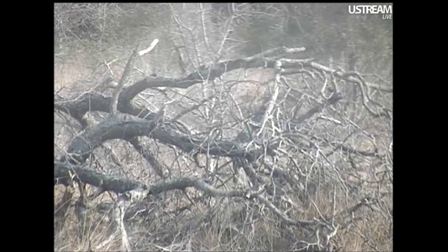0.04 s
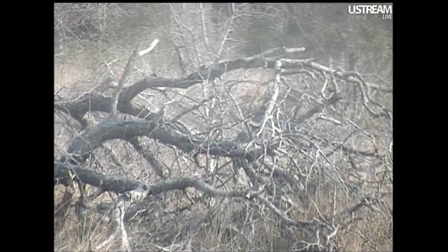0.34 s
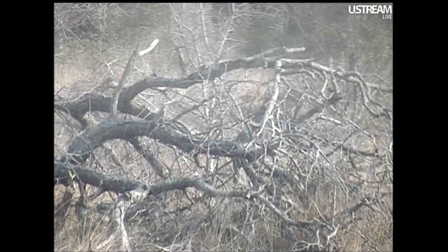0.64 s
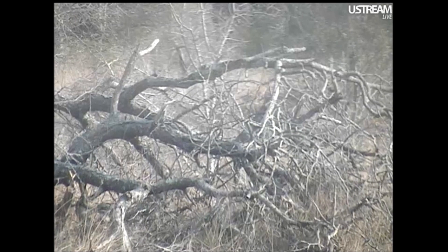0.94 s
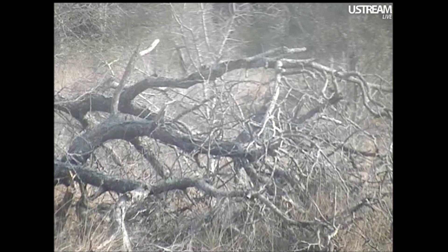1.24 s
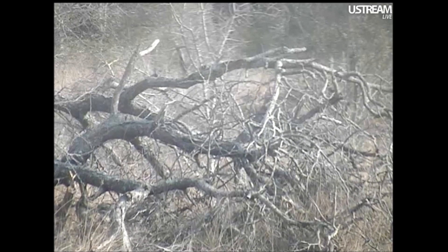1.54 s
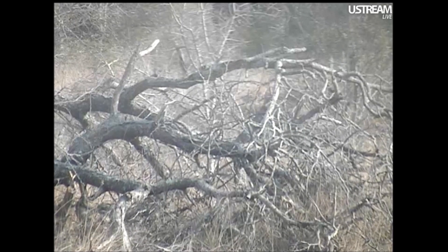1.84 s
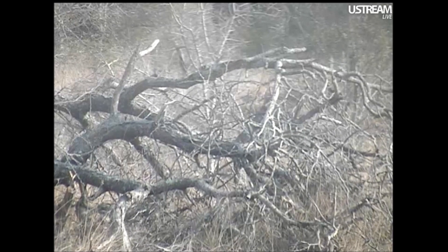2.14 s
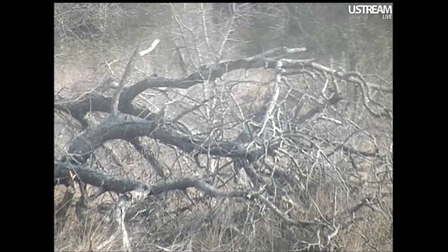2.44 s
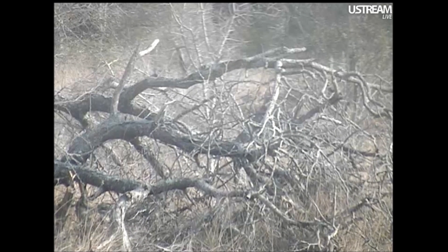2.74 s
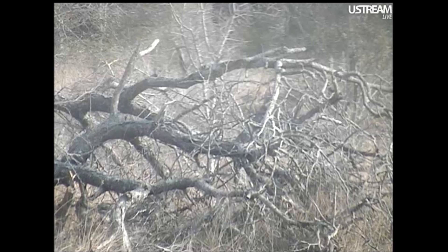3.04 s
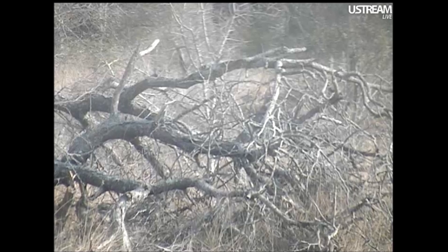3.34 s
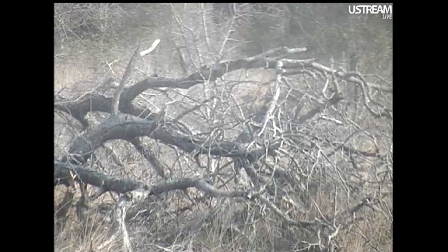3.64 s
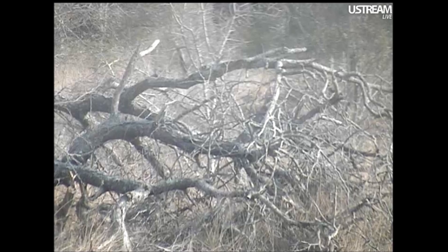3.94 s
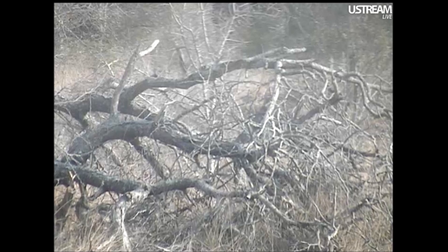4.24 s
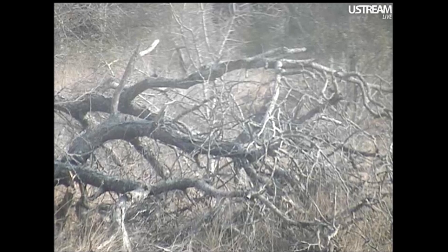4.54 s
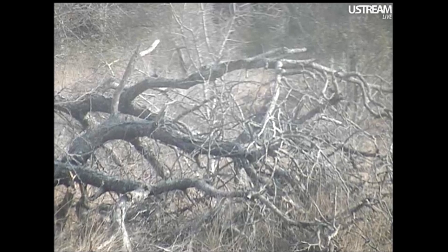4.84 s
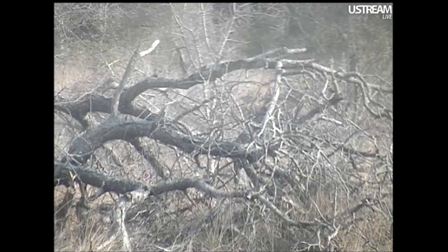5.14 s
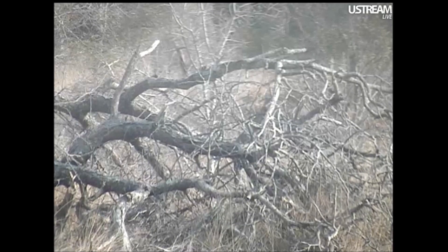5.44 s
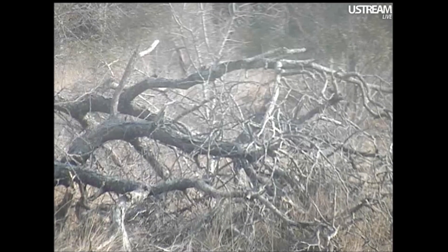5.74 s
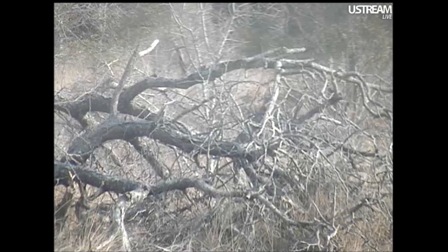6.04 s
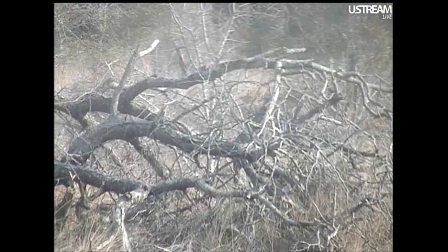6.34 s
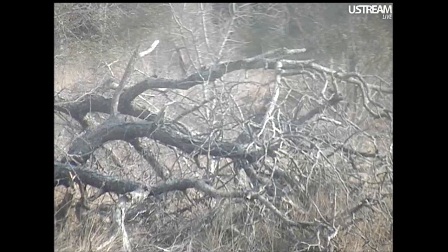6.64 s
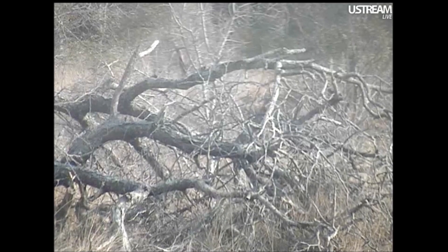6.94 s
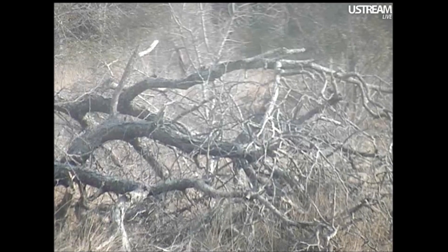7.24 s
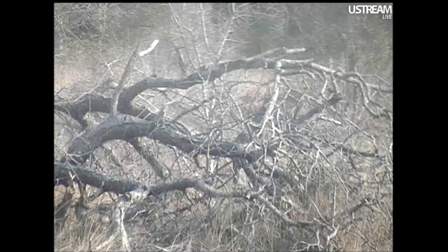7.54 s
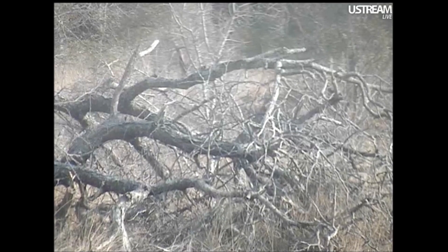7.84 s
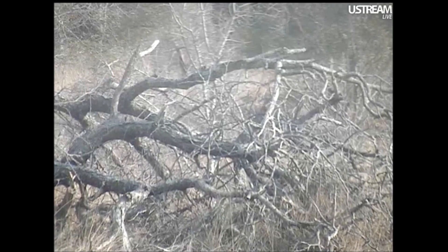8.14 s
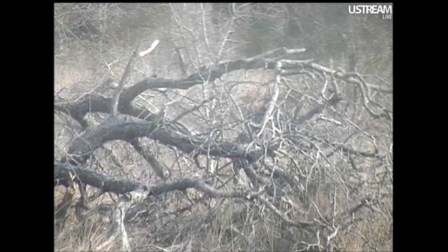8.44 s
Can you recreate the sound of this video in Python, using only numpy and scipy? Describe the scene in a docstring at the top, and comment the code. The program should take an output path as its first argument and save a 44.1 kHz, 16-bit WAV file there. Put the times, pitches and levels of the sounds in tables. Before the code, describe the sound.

In dry bush, a bird opens with one long nasal cry that falls and turns hoarse. Soft ticks and sharp, warbled alarm chips sound with it, and a small bird adds thin rising notes and long high whistles. The ticks stop before halfway, while the close chips grow louder and repeat to the end. One outdoor microphone picks it all up over faint still air and a low electrical hum.

```python
"""Birds raise the alarm in dry bush, heard through one outdoor microphone over still air and mains hum.
A go-away bird opens with a long nasal cry that arches, falls and turns hoarse as its voice slackens.
Soft ticks sound under the cry, and sharp warbled chips each open with the same tick and break downward.
A small bird then adds thin up-slurs and long whistles; faint swoops and dull bumps dot the distance.
The lone ticks stop before halfway, and the chips grow louder and keep on to the end."""
import sys
import numpy as np
from scipy import signal
from scipy.fft import rfft, irfft, next_fast_len
from scipy.io import wavfile
from scipy.ndimage import map_coordinates

SR = 44100
rng = np.random.default_rng(int(sys.argv[2]) if len(sys.argv) > 2 else 0)


def generate_wav(signal):
    """Clip the signal to [-1, 1] and save it as 16-bit WAV at the path in sys.argv[1]."""
    frames = np.transpose(np.atleast_2d(signal))
    scaled = np.clip(frames, -1, 1) * 32767
    pcm = np.round(scaled).astype(np.int16)
    wavfile.write(sys.argv[1], SR, pcm)


N = 378378

# Noise colour of the still air: f/Hz, level/dB
AIR_COLOUR = [(20, -12), (36, -4), (50, 5), (85, -6), (200, -14.5), (380, -22.5), (620, -12), (820, -13),
              (1100, -19.5), (2000, -8), (2900, -10), (4300, -10), (6000, -12), (6700, -14.5), (7300, -13),
              (8300, -25), (9300, -31.5), (15700, -32.5)]
# Harmonics of the mains hum: f/Hz, level/dB
HUM_PARTIALS = [(50, -57), (100, -68.5), (150, -53.5), (200, -72.5), (250, -66.5), (300, -69.5), (350, -82),
                (400, -71), (500, -63), (600, -67.5), (650, -67), (700, -62), (800, -68.5)]
# Reverb tail from the trees: f/Hz, t60/s, level/dB
TREE_REVERB = [(300, 0.42, 8), (1260, 0.51, 0.5), (2120, 1.59, 5.5), (2900, 1.2, -4), (3450, 1.63, 0.5),
               (3800, 1.4, -11.5), (4900, 1, 8.5), (6200, 0.86, 1), (7400, 0.74, 2.5)]
# Dull far bumps: t/s, length/s, centre f/Hz, level/dB
BUMP_CUES = [(2.439, 0.065, 513, -46), (4.882, 0.26, 286, -61.5), (5.393, 0.039, 790, -50),
             (7.232, 0.062, 270, -59)]
# Faint swooping whistles: t/s, length/s, start f/Hz, middle f/Hz, end f/Hz, level/dB
SWOOP_CUES = [(0.603, .16, 2130, 2150, 2386, -43), (2.805, .055, 3150, 2650, 2350, -56),
              (3.039, .31, 3000, 2180, 3070, -57.5), (4.653, 0.053, 2650, 2400, 2210, -50)]
# Soft ticking notes: t/s, relative level/dB
TICK_CUES = [(0.256, -36), (0.422, -31.5), (0.599, -37), (0.776, -32.5), (1.528, -35), (2.158, -37.5),
             (2.311, -31.5), (2.476, -30), (2.807, -39.5), (3.065, -41), (3.383, -42.5), (3.658, -41),
             (3.796, -38)]
# EQ that a tick sweeps through: f/Hz, level/dB
TICK_EQ = [(600, -6), (850, 5.5), (1100, -13), (1500, -3.5), (2200, -8.5), (3100, -0.5), (4000, -9.5),
           (6500, -12), (8000, -23.5)]
# Long whistles: t/s, length/s, start f/Hz, end f/Hz, start level/dB, end level/dB, quaver amount
WHISTLE_CUES = [(1.85, 0.65, 5160, 5900, -51.5, -52, 0.054), (1.871, 0.71, 4135, 4090, -54, -43.5, 0.034),
                (3.804, 0.7, 4670, 4470, -38.5, -31, 0.011), (5.47, .78, 5600, 5220, -53.5, -52.5, .028),
                (5.544, .795, 4806, 4510, -42, -44.5, .021), (8.03, 0.53, 4930, 4650, -44, -56.5, .018)]
# Up-slurs: t/s, length/s, top f/Hz, level/dB
SLUR_CUES = [(1.207, .024, 6900, -45.5), (1.304, .042, 7750, -31.5), (1.405, .037, 7530, -34),
             (1.518, .04, 7410, -33.5), (1.632, .038, 7050, -36), (1.736, .053, 6210, -31),
             (1.778, .055, 5510, -37), (3.276, .043, 7340, -46.5), (3.378, .042, 7400, -43),
             (3.481, .044, 7000, -42), (3.58, .045, 6760, -39), (3.681, .052, 5350, -38),
             (3.833, .034, 8240, -32.5), (3.926, .04, 7500, -38), (4.208, .054, 7760, -45.5),
             (5.163, .05, 8800, -42.5), (5.254, .025, 7700, -42), (5.337, .056, 7050, -42),
             (5.436, .042, 5500, -33.5), (7.306, .03, 8100, -48.5), (7.397, .037, 8200, -34.5),
             (7.63, 0.031, 9200, -35), (7.719, .035, 8400, -44.5), (7.807, .06, 6730, -46.5)]
# Nasal colour of the cry: f/Hz, level/dB
CRY_EQ = [(300, -48), (650, -4.5), (950, -8.5), (1400, -0.5), (2000, -11.5), (2800, -5), (4200, -5.5),
          (5200, -14.5), (6000, -6.5), (6900, -24.5), (8000, -31.5)]
# Volume curve of the cry: t/s, level/dB
CRY_LEVEL = [(.085, -21.5), (.13, -23.5), (.155, -29.5), (.187, -23), (.215, -27.5), (.3, -27), (.4, -33.5),
             (.54, -34.5), (.72, -41), (1.15, -46.5)]
# Path of the cry's moving throat resonance: t/s, f/Hz
CRY_FORMANT = [(.08, 1440), (.11, 1760), (.128, 1620), (.145, 2580), (.22, 2680), (.275, 3070), (.32, 4000),
               (.45, 3370)]
# Alarm chips, before the throat EQ: t/s, warble length/s, tail length/s, f/Hz, level/dB,
# 1st harmonic against the 2nd level/dB, relative tail level/dB
CHIP_CUES = [(0.455, 0.037, .01, 1717, -23, -13, -9.5), (.75, .025, 0.0064, 2180, -25.5, -9.5, -12),
             (1.001, 0.035, 0.023, 1720, -23, -12, -5.5), (1.38, .03, .009, 2190, -24.5, -7.5, -7.5),
             (1.56, .041, .025, 1712, -23, -11.5, -5.5), (3.549, .026, .009, 1668, -24.5, -8, -7),
             (3.73, 0.041, 0.0026, 1754, -17, -10, -25), (3.896, 0.035, 0.0052, 1736, -17, -11, -20),
             (4.124, 0.047, .012, 1815, -21, -6.5, -11), (4.433, .049, 0.0073, 1813, -15.5, -12, -9.5),
             (4.805, 0.051, .016, 1850, -14, -17, -10.5), (5.251, .052, .02, 1866, -18, -9, -10),
             (5.737, .05, .016, 1892, -14.5, -15.5, -7.5), (6.129, .047, .016, 1867, -12.5, -18, -11),
             (6.604, .051, .009, 1868, -16, -14, -4.5), (6.99, .042, .025, 1884, -20.5, -9.5, -0.5),
             (7.471, .047, .017, 1862, -14.5, -11.5, -6), (7.93, .05, .025, 1873, -14, -10.5, -6),
             (8.357, 0.05, .019, 1885, -13.5, -10, -10.5)]
# Throat EQ of the chipping bird: f/Hz, level/dB
CHIP_EQ = [(400, -14.5), (850, 0), (1100, -3.5), (1500, -3.5), (2050, .5), (2600, .5), (3900, -3),
           (4700, -6.5), (5850, 4), (6700, -8.5), (7600, -0.5)]
# Harmonics of a chip's tail: multiple of the pitch, level/dB
TAIL_PARTIALS = [(1, -15), (2, -1), (3, 1.5), (4, -12.5), (5, -14.5), (6, -20)]

FOLD_HZ, TOP_HZ = 8000, 15780  # band edge of the link, final high cut
WARBLE_HZ, BREAK_RATIO = 100.8, .7  # a chip's mean flutter rate, its lower register against its pitch


def amp(db):
    """Decibels to gain."""
    return 10 ** (np.asarray(db) / 20)


def unit(x):
    """x at rms 1."""
    return x / np.sqrt(np.mean(x ** 2) + 1e-20)


def along(points, hz):
    """An EQ curve (f/Hz, level/dB) read on a log frequency axis."""
    f, db = np.transpose(points)
    return np.interp(np.log(hz + 1), np.log(f + 1), db)


def curves(rows, at):
    """Each later column, interpolated along the first."""
    axis, *columns = np.transpose(rows)
    return [np.interp(at, axis, column) for column in columns]


def clock(length):
    """Sample times over a length in seconds."""
    return np.arange(int(max(length, .002) * SR)) / SR


def wobble(rate, t):
    """A smooth random modulator, rate knots a second."""
    u = (t - t[0]) * rate
    return map_coordinates(rng.standard_normal(int(u[-1]) + 4), [u + 1], mode="nearest")


def cycle(hz):
    """Phase of an oscillator that follows a pitch curve."""
    return 2 * np.pi * np.cumsum(hz) / SR


def gate(t, length, rise, fall):
    """A note's envelope with soft fades."""
    return np.sin(np.pi / 2 * np.clip(np.minimum(t / rise, (length - t) / fall), 0, 1)) ** 2


def filtered(x, response):
    """x through a zero-phase EQ, given as gain against frequency."""
    m = next_fast_len(x.shape[-1] + 8192)
    return irfft(rfft(x, m) * response(np.fft.rfftfreq(m, 1 / SR)), m)[..., :x.shape[-1]]


def add(track, s, sound):
    """Mix a sound into a track at s seconds."""
    part = track[max(round(s * SR), 0):][:len(sound)]
    part += sound[:len(part)]


def background():
    """The bed: still air over the bush, and mains hum on the microphone line."""
    t = np.arange(N) / SR
    air = unit(filtered(rng.standard_normal(N), lambda hz: amp(along(AIR_COLOUR, hz))))
    hum = sum(amp(db + .4 * wobble(3, t)) * np.sin(2 * np.pi * (hz * t + rng.random()))
              for hz, db in HUM_PARTIALS)
    return amp(-48) * air + np.sqrt(2) * hum


def bush(x, near_db, far_db):
    """Near branches scatter a short answer; the trees around return a long faint tail."""
    hz, frame_s, noise = signal.stft(rng.standard_normal(SR), SR, nperseg=256)
    t60, colour_db = curves(TREE_REVERB, hz[:, None])
    far = signal.istft(noise * amp(colour_db - 60 * frame_s / t60), SR, nperseg=256)[1][:SR]
    t = np.arange(len(far)) / SR
    far *= 1 - np.exp(-t / .0049)
    near = rng.standard_normal(len(t)) * amp(-60 * t / .12) * (t > .003)
    answer = amp(near_db) * near / np.linalg.norm(near) + amp(far_db) * far / np.linalg.norm(far)
    return x + signal.fftconvolve(x, answer)[:N]


def bumps():
    """Dull, far bumps: short swells of low, narrow-band noise."""
    out = np.zeros(N)
    for s, length, centre_hz, db in BUMP_CUES:
        t = clock(length)
        noise = rng.standard_normal(len(t))
        dull = filtered(noise, lambda hz: 1 / (1 + ((hz - centre_hz) / (.19 * centre_hz)) ** 4))
        add(out, s, amp(db) * unit(dull) * gate(t, length, .6 * length, .38 * length))
    return out


def swoops():
    """Faint, lower whistles, each one smooth pitch bend on a pure tone."""
    out = np.zeros(N)
    for s, length, start_hz, middle_hz, end_hz, level_db in SWOOP_CUES:
        t = clock(length)
        bend = np.polyfit([0, .5, 1], [start_hz, middle_hz, end_hz], 2)
        hz = np.polyval(bend, t / length)
        note = unit(np.sin(cycle(hz * (1 + .005 * wobble(700, t)))))
        add(out, s, amp(level_db + 1.5 * wobble(40, t)) * gate(t, length, .02, .02) * note)
    return out


def whip():
    """A downward sweep so fast that it reads as a tick."""
    t = clock(.03)
    hz = 850 + 6500 * np.exp(-t / .0015)
    sweep = np.sin(cycle(hz * (1 + .1 * wobble(1500, t))))
    return sweep * amp(along(TICK_EQ, hz) - 60 * t / .032) * gate(t, t[-1], .0004, .01)


def ticks():
    """Soft lone ticks, each a single whip like the one that opens a chip."""
    out = np.zeros(N)
    for s, db in TICK_CUES:
        add(out, s - .003, amp(db + 7.5) * whip())
    return out


def whistles():
    """The small bird's long whistles scoop in, glide, and settle from a quaver towards a steady tone."""
    out = np.zeros(N)
    for s, length, start_hz, end_hz, start_db, end_db, quaver in WHISTLE_CUES:
        t = clock(length)
        late = t / length
        glide_hz = start_hz + (end_hz - start_hz) * late ** .75
        scoop = .0806 * np.exp(-t / .013)
        droop = .03 * np.exp((t - length) / .02)
        shake = quaver * (1 - .6 * late)
        jitter = 1.9 * shake * wobble(912, t) + .003 * wobble(30, t)
        note = unit(np.sin(cycle(glide_hz * (1 - scoop - droop) * (1 + jitter))))
        flutter_db = (1.1 + 100 * np.minimum(shake, .025)) * wobble(200, t)
        level_db = start_db + (end_db - start_db) * late + flutter_db
        add(out, s, amp(level_db) * gate(t, length, .012, .012) * note)
    return out


def slurs(start_hz=4600, crest_share=.64):
    """The small bird's thin notes rise from one pitch and hook over, gaining strength as they climb."""
    out = np.zeros(N)
    for s, length, top_hz, level_db in SLUR_CUES:
        t = clock(length)
        hz = top_hz - (top_hz - start_hz) * np.abs(t / (crest_share * length) - 1) ** 1.45
        note = np.sin(cycle(hz * (1 + .022 * wobble(700, t))))
        lift_db = 3 * np.clip((hz - 6000) / 1000, -1, 1)
        add(out, s, amp(level_db + lift_db + 3 * wobble(130, t)) * gate(t, length, .003, .01) * note)
    return out


def cry_pitch(t, crest_s=.11, width_s=.04, foot_hz=496.4, top_hz=871):
    """The cry opens on an arch; then the voice slackens, its period growing steadily."""
    since = t - crest_s
    arch = foot_hz + (top_hz - foot_hz) * np.exp(-(since / width_s) ** 2)
    sinking = 1 / (1 / 762 + .0026 * since)
    return np.select([since < 0, since < width_s], [arch, np.maximum(arch, sinking)], sinking)


def cry(start_s=.069, length=1.133):
    """The go-away bird: a buzzy harmonic stack sinks and turns hoarse while a throat resonance climbs."""
    out, t = np.zeros(N), clock(length) + start_s
    pitch = cry_pitch(t)
    throat_hz, = curves(CRY_FORMANT, t)
    level_db, = curves(CRY_LEVEL, t)
    catch = .6 * np.exp(-(t - start_s) / .014)  # the voice catches as it starts
    rasp = np.clip(.092 + catch + np.maximum(t - .25, 0), 0, .72)  # roughens from 0.25 s on
    phase = cycle(pitch * (1 + .02 * rasp * wobble(300, t) + .003 * wobble(60, t)))
    pure = np.interp(t, [.112, .165], [1, 0])  # the opening note has few overtones
    voice, power = 0, 0
    for k in range(1, 28):
        hz = k * pitch
        resonance_db = 17 * (1 - rasp) / (1 + ((hz - throat_hz) / 250) ** 2)
        mellow_db = -17 * pure * np.clip(hz / 1700 - 1, 0, 1)
        chest_db = 13 * (rasp - .3) / (1 + (hz / 1300) ** 4)  # the slack voice keeps its low end
        colour_db = along(CRY_EQ, hz) + resonance_db + mellow_db + chest_db
        gain = amp(colour_db + 2.1 * wobble(29.74, t)) * (hz < FOLD_HZ)
        hoarse = rasp * (.89 + .26 * hz / 4000) + .2 * (hz / 5000) ** 2  # the top is always gritty
        voice += gain * (1 + hoarse * wobble(420, t)) * np.sin(k * phase)
        voice += gain * hoarse * wobble(420, t) * np.cos(k * phase)
        power += gain ** 2 * (1 + 2 * hoarse ** 2) / 2
    envelope = amp(level_db) * gate(t - start_s, length, .022, .07)
    add(out, start_s, envelope * voice / np.sqrt(power))
    return out


def raspy(phase, partials, rasp, t):
    """Partials (multiple, level/dB), each roughened by fast random shifts of level and phase."""
    def grit():
        return rasp * (.65 * wobble(1000, t) + .28 * wobble(2600, t))
    return sum(amp(db) * ((1 + grit()) * np.sin(k * phase) + grit() * np.cos(k * phase))
               for k, db in partials)


def steadied(x, top):
    """The voice can swing only so far: its envelope is soft-limited at top times rms, then set to rms 1."""
    x = unit(x)
    envelope = np.abs(signal.hilbert(x))
    return unit(x / (1 + (envelope / top) ** 4) ** (1 / 4))


def warble(length, pitch, rasp, first_db):
    """A chip's body: scallops of pitch, strongest on the 2nd harmonic, weak and rough in the notches."""
    t = clock(length + .0022)
    late = t / t[-1]
    rate = WARBLE_HZ * (1 + .045 * (wobble(100, t) + wobble(9.9, t)))
    notch = (1 - np.abs(np.sin(cycle(rate) / 2))) ** 1.513
    dip = notch * amp(2.12 * wobble(105.3, t))
    jitter = .01 * wobble(151.3, t) + .007 * wobble(700, t)
    bow = 1.044 + .006 * (.5 - late) - .17 * (late - .44) ** 2  # the whole note arches
    phase = cycle(pitch * (bow - .1389 * dip * (.756 + .5 * late) + jitter))
    partials = [(1, first_db), (2, 0), (3, first_db - 2), (4, first_db - 10)]
    level_db = -(7.5 + 8 * late) * dip - 1.8 * late + 1.9 * wobble(150, t)
    envelope = amp(level_db) * gate(t, length + .002, .0016, .0057)
    roughness = (rasp + .28 * late ** 3) * (.56 + 1.47 * notch)
    voice = raspy(phase, partials, roughness, t)
    # one rough partial of the lower register creeps in ahead of the break
    undertone = amp(-34 + 12 * late) * raspy(BREAK_RATIO * phase, [(1.8, 0)], 1, t)
    return steadied(envelope * (voice + undertone), top=1.84)


def voice_break(length, pitch):
    """A chip's tail: the voice drops to a lower register and sags, still shaken by the warble."""
    t = clock(length + .0039)
    late = t / t[-1]
    shake = np.sin(2 * np.pi * WARBLE_HZ * t)
    hz = pitch * (BREAK_RATIO - .095 * late) * (1 + .02 * shake + .014 * wobble(400, t))
    fade = amp(-12 * late + 2.6 * shake + .8 * wobble(200, t)) * gate(t, t[-1], .0012, .0035)
    return steadied(fade * raspy(cycle(hz), TAIL_PARTIALS, .36, t), top=3.5)


def chips():
    """The close bird's alarm: each chip is a lead-in tick, a warble and a break, through one throat."""
    out, t = np.zeros(N), clock(.03)
    tick_envelope = amp(-2.5 - 60 * t / .027) * gate(t, t[-1], .0023, .01)
    for s, length, tail_s, pitch, level_db, first_db, tail_db in CHIP_CUES:
        rasp = .14 + .07 * max(-13 - level_db, 0)  # weak chips are raspier
        add(out, s - .0155, amp(level_db) * tick_envelope * whip())
        add(out, s, amp(level_db) * warble(length, pitch, rasp, first_db))
        add(out, s + length, amp(level_db + tail_db + 1.5) * voice_break(tail_s, pitch))
    return filtered(out, lambda hz: amp(along(CHIP_EQ, hz)))


def scene():
    """All the birds sent into the bush reverb, in dual mono; the chips are closest and driest."""
    close = bush(chips(), near_db=-16, far_db=-19)
    crier = bush(cry(), near_db=-11, far_db=-13.5)
    distant = bush(slurs() + whistles() + swoops() + bumps(), near_db=-10, far_db=-12.5)
    ticking = bush(ticks(), near_db=-12, far_db=-17)
    mono = close + crier + distant + ticking
    return np.array([mono, mono])


def record(dry):
    """A narrow-band link mirrors the highest notes just above its edge; the steady bed joins after it."""
    t = np.arange(N) / SR
    inband = filtered(dry, lambda hz: hz < FOLD_HZ)
    mirrored = inband * (1 + 2 * np.cos(2 * np.pi * 2 * FOLD_HZ * t))
    eq_hz = [6400, 6870, 7240, 7820, 8700, 9040, 9600]
    eq_db = [3, -2, 6.5, -8, -10, -23, -96.5]
    link = filtered(mirrored, lambda hz: amp(np.interp(hz, eq_hz, eq_db)))
    return filtered(link + background(), lambda hz: hz < TOP_HZ)


dry = scene()
out = record(dry)
generate_wav(out)
```